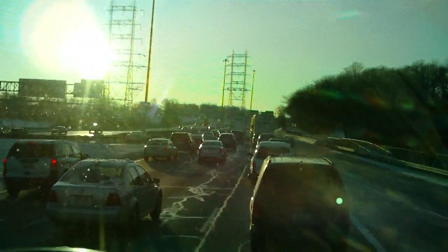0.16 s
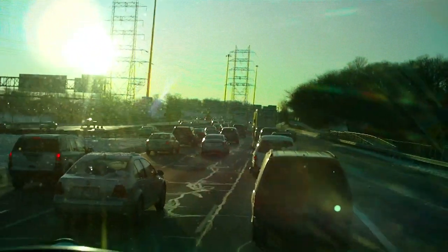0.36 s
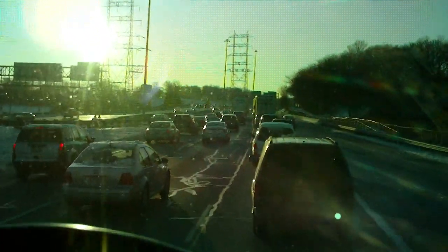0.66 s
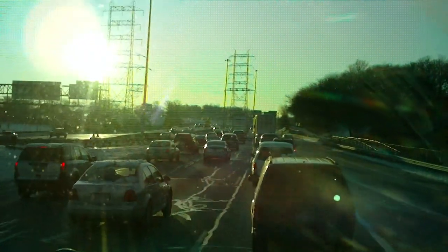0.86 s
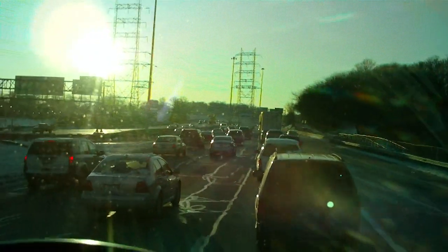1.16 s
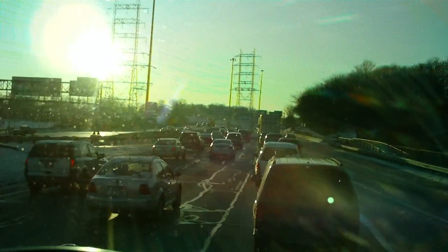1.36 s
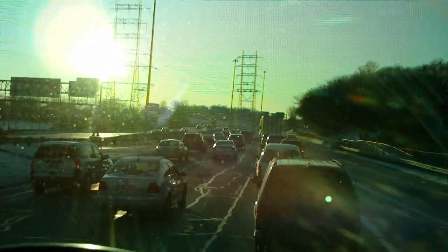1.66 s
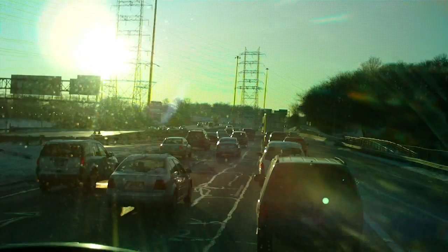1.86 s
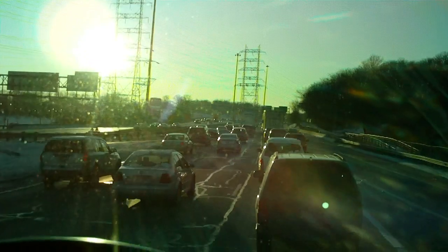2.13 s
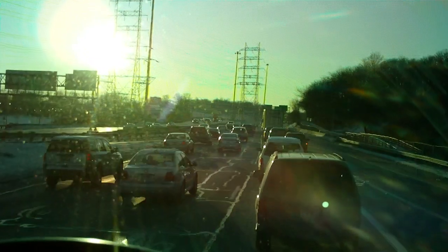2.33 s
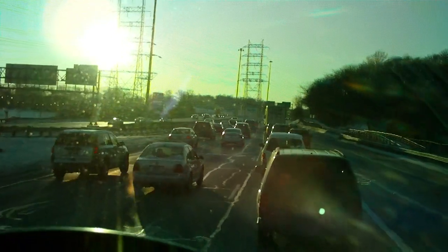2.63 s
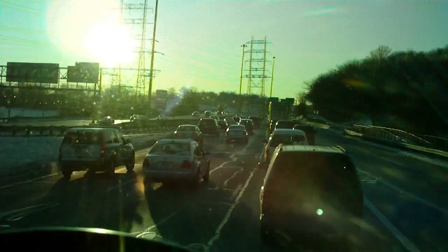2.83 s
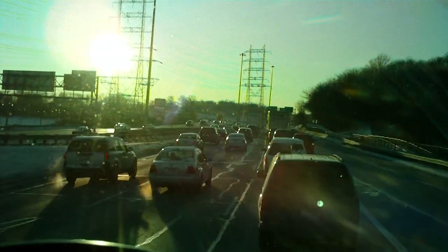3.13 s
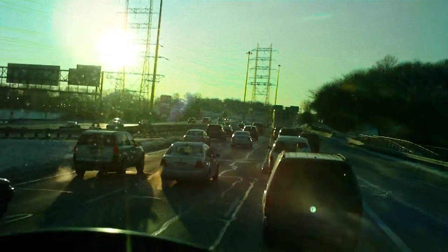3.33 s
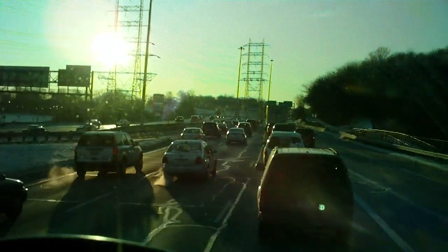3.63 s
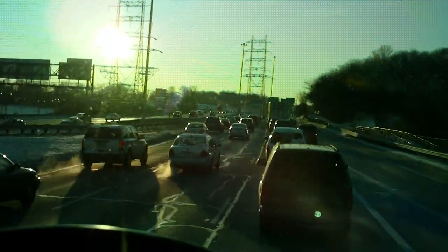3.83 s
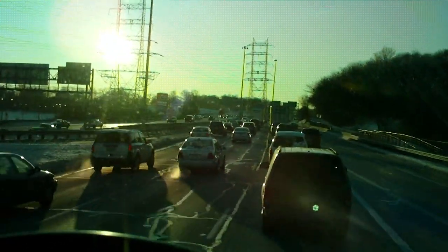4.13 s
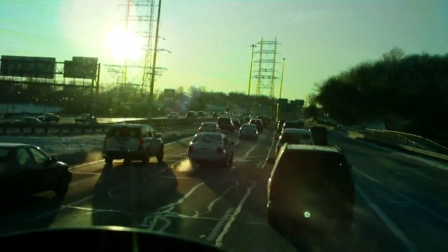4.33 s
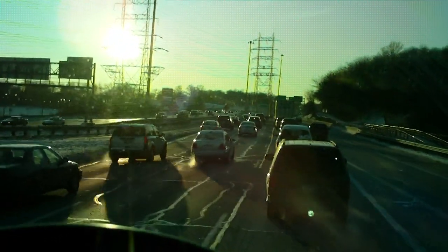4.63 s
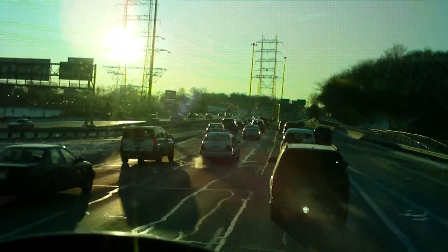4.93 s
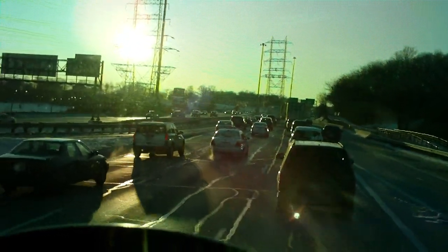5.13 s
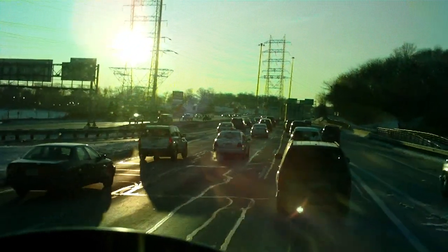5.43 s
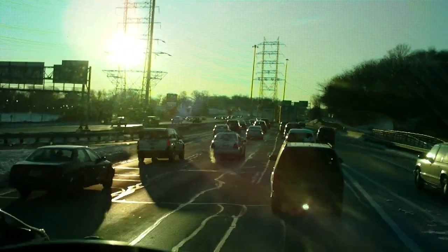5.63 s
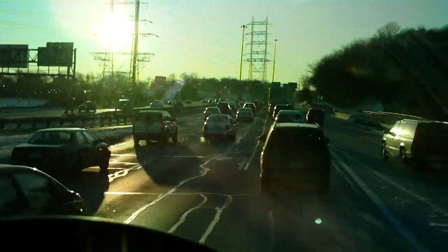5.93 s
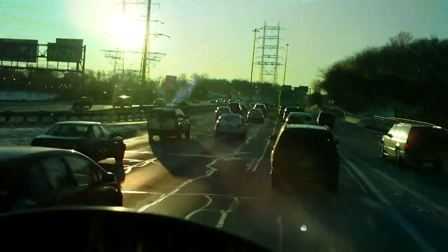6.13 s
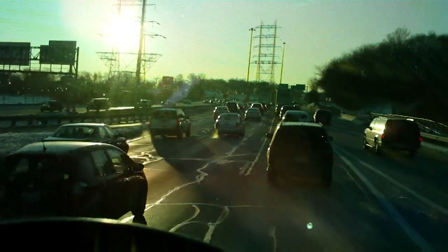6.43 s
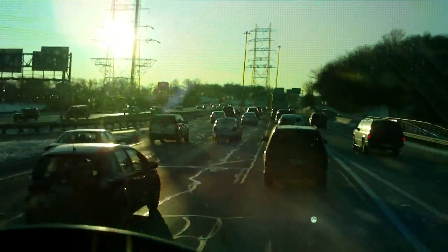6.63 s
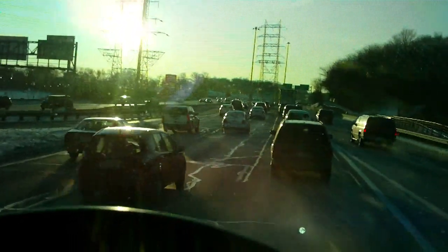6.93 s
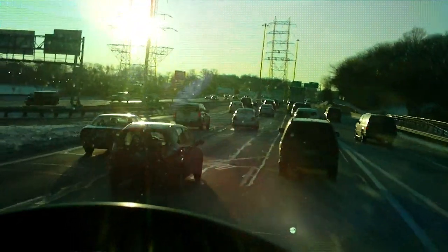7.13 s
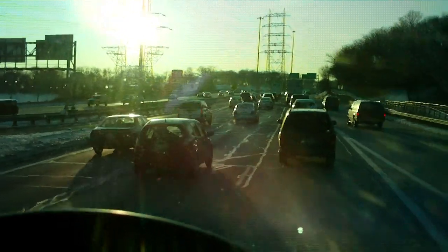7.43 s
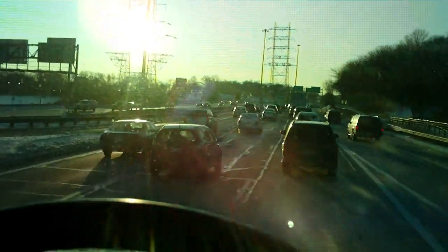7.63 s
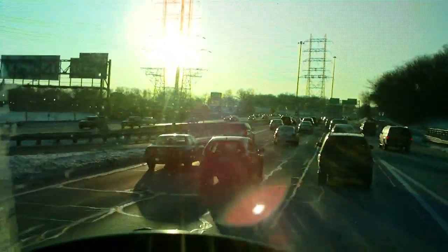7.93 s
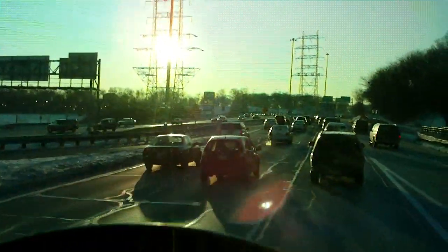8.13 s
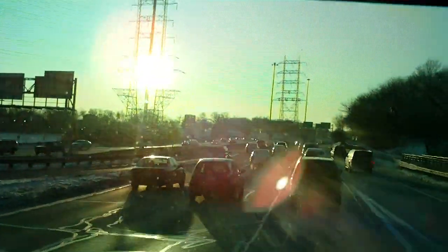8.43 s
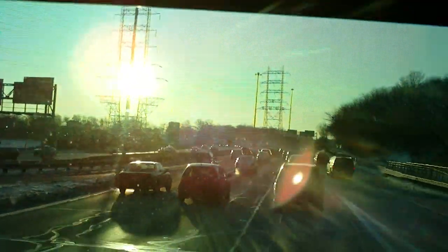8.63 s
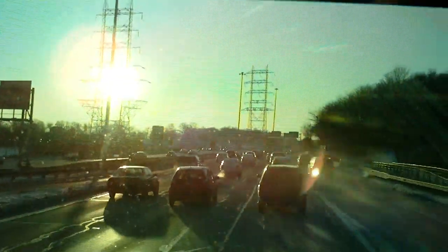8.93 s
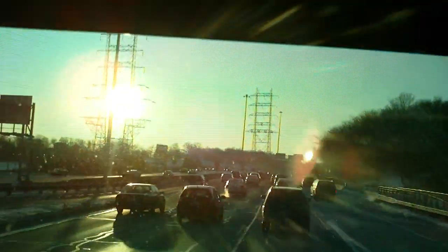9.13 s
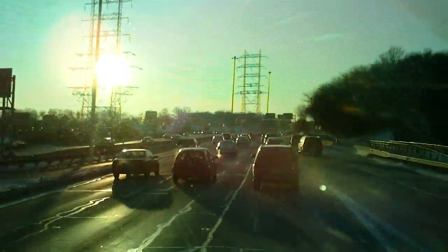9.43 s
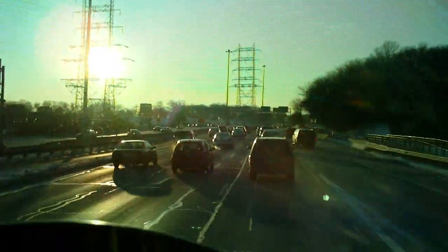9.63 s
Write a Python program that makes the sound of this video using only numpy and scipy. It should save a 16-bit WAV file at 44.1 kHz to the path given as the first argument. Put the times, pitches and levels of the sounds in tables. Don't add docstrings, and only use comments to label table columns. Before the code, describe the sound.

Heard inside a diesel truck cab in slow traffic through a small, overloaded microphone: bass is thinned and breaks into gritty crackle, treble is coarse and limited. From 0 to 3 s the engine coasts, its rapid throb slowing to a low chug; a faint high gear whine fades by about 2 s, with road bumps and brief thin hisses near 0.8 and 1.9 s. At 3.1 s the throttle opens, a faint belt squeal flickers until 3.8 s, and the engine climbs. It pulls loudest from about 4.2 to 5.4 s, knocking and growling, with longer air hisses around 4.3 and 5.6 s. It drops back by 6 s, catches abruptly at 6.6 s, wavers, then rises through a second surge, with sharp jolts near 7.6 and 8.2 s. Pitch peaks around 8.9 s; a final soft hiss comes near 9.35 s as the load eases.

```python
import sys
import numpy as np
from scipy import signal
from scipy.fft import rfft, irfft
from scipy.io import wavfile
from scipy.ndimage import uniform_filter1d, minimum_filter1d

SR = 44100
rng = np.random.default_rng(int(sys.argv[2]) if len(sys.argv) > 2 else 0)


def transcribe(u):
    v = np.clip(np.atleast_2d(u).T, -1, 1)
    q = np.round(v * 32767).astype(np.int16)
    wavfile.write(sys.argv[1], SR, q)


def volts_from_db(level):
    exponent = np.asarray(level, float) / 20
    return 10 ** exponent


N = 430857

# frequency in Hz, level in dB per Hz.
ROAD_COLOUR = [(15, -2.5), (40, -3), (90, 2.5), (140, 0), (200, -6.5), (300, -4), (450, -8), (620, -12),
               (1200, -27), (2500, -32.5)]
# middle in seconds, length in seconds, dB above HISS_DB.
HISSES = [
    (0.78, 0.41, 9),
    (1.55, 0.15, -1),
    (1.88, 0.27, 4),
    (4.3, 0.96, 10),
    (5.6, 1, 12.5),
    (9.35, 0.92, 6),
]
# frequency in Hz, width in Hz, level in dB.
HISS_MODES = [(5056, 80, 5), (5050, 80, -21)]
# time in seconds, level in dB.
SQUEAL = [
    (3.08, -77),
    (3.13, -50),
    (3.22, -49),
    (3.3, -60),
    (3.5, -51),
    (3.55, -47.5),
    (3.7, -44),
    (3.78, -80),
]
# frequency in Hz, width in Hz, level in dB.
SQUEAL_MODES = [(4250, 160, 0), (4600, 200, -5)]
# time in seconds, level in dB.
WHINE = [
    (0, -41),
    (.5, -40),
    (.9, -42),
    (1.4, -47),
    (2.0, -62),
    (9.77, -70),
]
# frequency in Hz, level in dB per Hz.
CLATTER_COLOUR = [(900, -12), (1200, 0), (1700, -2), (2200, -7), (3000, -12), (4000, -18), (5000, -25),
                  (6000, -30)]
# frequency in Hz, width in Hz, dB against the knock.
CLATTER_MODES = [(1620, 120, -19), (3830, 150, -32), (4270, 80, -29), (4670, 80, -27), (5100, 80, -27)]
# frequency in Hz, width in Hz, level in dB.
KNOCK_MODES = [(389.7, 23, -8), (644, 41, -11), (797.4, 46, -0.5), (936, 70, -0.5), (996.3, 100, -2)]
# time in seconds, firings per second in Hz.
SPEED = [(0.0, 33.4), (0.6, 29.4), (1.74, 25.7), (2.9, 17.8), (3.08, 18.5), (3.3, 25.7), (3.8, 37.0),
         (4.4, 35.8), (5.33, 41.1), (5.7, 38.8), (6.0, 33.6), (6.6, 29.2), (6.91, 33.4), (7.21, 30.3),
         (7.5, 34.0), (8.4, 39.0), (8.9, 43.0), (9.77, 37.3)]
# time in seconds, level in dB.
LOAD = [(0.0, -41), (1.5, -42), (3.05, -36.5), (3.14, -29.5), (3.4, -34.5), (3.8, -31.5), (4.16, -24),
        (5.2, -23.5), (5.55, -27.5), (6.0, -39), (6.57, -38.5), (6.63, -29), (6.95, -29), (7.37, -32),
        (8.5, -26.5), (9.3, -28.5), (9.55, -36), (9.77, -36.5)]
# middle in seconds, length in seconds, engine dB, road dB.
JOLTS = [(0.08, 0.033, 6.5, 1), (0.32, 0.12, 4.5, 1.5), (0.43, .04, 6, 4), (0.8, 0.14, 5, 3.5),
         (1.33, 0.3, 0, 3.5), (1.57, 0.23, 6, 4), (2.36, 0.057, 0, 7), (3.21, 0.071, 5, -0.5),
         (3.48, 0.08, -11, -7.5), (3.56, 0.036, 11.5, 5.5), (3.66, 0.14, 2.5, 1), (3.77, 0.059, 6.5, -2),
         (7.53, 0.016, -6, -19), (7.585, .07, 8, 14.5), (7.97, 0.016, -11, -12), (8.12, 0.07, -6.5, 5),
         (8.225, 0.039, 8, 11.5), (8.34, 0.077, -7.5, -5.5), (8.45, 0.066, 0, 6), (8.93, 0.046, -9, -8),
         (9.29, 0.062, 1.5, 1.5)]
ORDER_DB = [-26.5, -32.5, -31, -31]
ORDER_FOLLOWS = [.15, .2, .4, .3]
# middle in seconds, length in seconds, change in dB.
BOOMS = [
    [(0.3, 0.5, 2), (2.7, .45, 4.5), (3.3, 0.23, -6), (5.33, 0.19, 1), (6.1, 0.66, 3), (7.12, 0.88, -10.5),
     (9.05, 0.52, -10.5)],
    [(1.9, 0.91, 9), (2.6, 0.51, -13.5), (2.9, 0.11, 4), (4.18, .3, -1), (4.6, .3, -15), (7.15, 0.74, 12),
     (8.85, 0.81, 13)],
    [(0.75, 0.37, 9), (2.6, 0.95, -6), (4.3, 0.72, -8), (4.8, 0.39, 9), (5.6, 0.26, 7.5), (7.6, 1.05, 10),
     (9.3, 0.54, 5)],
    [(0.2, 0.54, -10), (1.65, 0.51, 9), (3.3, .25, 6.5), (3.8, 0.089, 14.5), (4.7, 0.83, 8.5),
     (6.15, .5, -6.5), (6.8, 0.44, 6), (8.25, 0.41, 3), (9.2, 1.1, -9)],
]
# middle in seconds, length in seconds, change in dB.
UPPER_BOOMS = [
    [(0.8, 0.71, -5.5), (5.0, 0.75, 4.5), (6.2, 0.87, -6), (8.8, 1.0, 8)],
    [(3.0, .3, -3), (4.3, 0.13, 2.5), (5.1, 0.43, 3), (6.5, .8, -5), (7.7, 0.69, 5)],
]
# frequency in Hz, dB against load.
CAB_MODES = [(90, -2.5), (150, -10), (180, -11), (207, 0), (240, -8), (280, -6.5), (330, -17), (390, -6),
             (420, -11), (480, -12.5)]
CRANK_DB = [-40, -39, -37, -40.5, -34.5, -36, -37.5, -40, -42.5, -43.5]
# time in seconds, drive (1 just touches the rail).
DRIVE = [(0.0, 1.12), (2.1, 1.1), (3.0, 1.05), (3.4, 1.16), (4.2, 1.02), (5.7, 1.05), (6.2, 1.15),
         (8.9, 1.15), (9.77, 1.0)]
# middle in seconds, length in seconds, drive lost.
LULLS = [(0.74, .14, .25), (1.14, .18, .25), (1.88, .14, .25), (2.2, .12, .25), (2.63, .13, .25),
         (2.85, .2, .04), (3.03, .14, .25), (4.05, .15, .2), (5.58, .2, .1)]
RECOVERY_HZ = [3200, 3700, 3900, 4000, 4100, 4350]

FULL_PULL_DB = -28
ROAD_DB, ROAD_FOLLOWS = -28.5, 0.56
CLATTER_DB, CLATTER_FOLLOWS = -39, .6
CLATTER_JOLTS = .25
UPPER_DB, UPPER_FOLLOWS = -31.5, .8
CRANK_FOLLOWS = 0.49
HISS_DB = -71.5
WHINE_ORDER = 30
LOW_CUT_HZ, OVERLOAD, HOLD_HZ = 285, 1., 12000


def rms_one(x):
    return x / np.sqrt(np.mean(x ** 2) + 1e-20)


def in_time(rows):
    s, *columns = np.transpose(rows)
    return [np.interp(np.arange(N) / SR, s, c) for c in columns]


def swells(rows):
    s, length, *sizes = np.transpose(rows)
    coarse = np.arange(0, N + 64, 64)
    distance = (coarse[:, None] / SR - s) / np.maximum(length, .01)
    bells = .5 ** ((2 * distance) ** 2)
    return [np.interp(np.arange(N), coarse, bells @ size) for size in sizes]


def drift(rate_hz):
    r = np.exp(-80 * np.pi * rate_hz / SR)
    noise = rng.standard_normal(N // 40 + 2002)
    slow = signal.lfilter([1], [1, -2 * r, r * r], noise)[2000:]
    return np.interp(np.arange(N) / 40, np.arange(len(slow)), rms_one(slow))


def coloured(spectrum):
    hz, level_db = np.transpose(spectrum)
    log_hz = np.log(np.arange(N // 2 + 1) * SR / N + 1)
    shape = volts_from_db(np.interp(log_hz, np.log(hz), level_db))
    return rms_one(irfft(rfft(rng.standard_normal(N)) * shape, N))


def resonate(x, modes):
    out = 0
    for k, (hz, width_hz, level_db) in enumerate(modes):
        r = np.exp(-np.pi * width_hz / SR)
        ring = signal.lfilter([1, 0, -1], [1, -2 * r * np.cos(2 * np.pi * hz / SR), r * r], x)
        out = out + (-1) ** k * volts_from_db(level_db) * rms_one(ring)
    return out


def bursts(turn, per_firing, sharp, spread_db, floor):
    count = (turn * per_firing).astype(int)
    size = volts_from_db(spread_db * rng.standard_normal(count[-1] + 1))[count]
    return floor + size * np.sin(np.pi * (turn * per_firing - count)) ** (2 * sharp)


def road_rumble(rumble_db):
    return volts_from_db(rumble_db + 3.0 + 1.5 * drift(37)) * coloured(ROAD_COLOUR)


def air_hiss():
    level_db = HISS_DB + swells(HISSES)[0] + 3.9 * drift(20)
    return volts_from_db(level_db) * resonate(rng.standard_normal(N), HISS_MODES)


def belt_squeal():
    level_db = in_time(SQUEAL)[0] + 2.77 * drift(23)
    return volts_from_db(level_db) * resonate(rng.standard_normal(N), SQUEAL_MODES)


def gear_whine(turn):
    return volts_from_db(in_time(WHINE)[0]) * np.sin(2 * np.pi * WHINE_ORDER * turn)


def clatter(turn, clatter_db, knock_db):
    gate = bursts(turn, 2, sharp=.8, spread_db=1.5, floor=.35)
    singing = resonate(gate * rng.standard_normal(N), CLATTER_MODES)
    rustle = rms_one(gate * coloured(CLATTER_COLOUR))
    return volts_from_db(clatter_db - 1.0) * rustle + volts_from_db(knock_db) * singing


def knock(turn):
    gate = bursts(turn, 0.99, sharp=1.4, spread_db=2.0, floor=1.0)
    return rms_one(resonate(gate * rng.standard_normal(N), KNOCK_MODES))


def orders(turn, firing_hz, levels_db, load_db, upper_booms_db):
    out = 0
    for k, level_db in enumerate(levels_db, 1):
        out = out - volts_from_db(level_db) * np.cos(2 * np.pi * k * turn + .15 * drift(3))
    for k in range(5, 13):
        passed_db = np.interp(k * firing_hz, *np.transpose(CAB_MODES)) + upper_booms_db.get(k, 0)
        level_db = 1.5 * load_db + 15 + passed_db + 2 * drift(1.5)
        out = out - volts_from_db(level_db) * np.cos(2 * np.pi * k * turn + .35 * drift(1.5))
    thirds = [k / 3 for k in range(2, 17) if k % 3]
    for k, third_db in zip(thirds, CRANK_DB):
        level_db = third_db + CRANK_FOLLOWS * (load_db - UPPER_DB) + 4.3 * drift(1.5)
        out = out + volts_from_db(level_db) * np.cos(2 * np.pi * k * turn + 1.5 * drift(1.5))
    return np.sqrt(2) * out


def cab(x):
    zero = np.exp(-2 * np.pi * LOW_CUT_HZ / SR)
    pole = np.exp(-2 * np.pi * 9.6 / SR)
    return signal.lfilter([1, -zero], [1, -pole], x)


def scene():
    firing_hz, = in_time(SPEED)
    load_db, = in_time(LOAD)
    swing_db = load_db - FULL_PULL_DB
    engine_jolt_db, road_jolt_db = swells(JOLTS)
    turn = np.cumsum(firing_hz) / SR

    rumble_db = ROAD_DB + ROAD_FOLLOWS * swing_db + road_jolt_db
    background = road_rumble(rumble_db) + air_hiss() + belt_squeal() + gear_whine(turn)

    knock_db = load_db + engine_jolt_db
    clatter_db = CLATTER_DB + CLATTER_FOLLOWS * swing_db + CLATTER_JOLTS * engine_jolt_db
    levels_db = [db + share * swing_db + swells(booms)[0]
                 for db, share, booms in zip(ORDER_DB, ORDER_FOLLOWS, BOOMS)]
    upper_booms_db = {k: swells(booms)[0] for k, booms in enumerate(UPPER_BOOMS, 5)}
    upper_load_db = UPPER_DB + UPPER_FOLLOWS * swing_db
    engine = clatter(turn, clatter_db, knock_db) + volts_from_db(knock_db) * knock(turn)
    engine = engine + orders(turn, firing_hz, levels_db, upper_load_db, upper_booms_db)
    return cab(background + engine)[None]


def gain_control(x, most_db, aim, span_s):
    span = int(span_s * SR)
    peak = -minimum_filter1d(-np.abs(x), span)
    return x * uniform_filter1d(np.minimum(volts_from_db(most_db), aim / peak), span)


def overload(x, stick, ring_width_hz, ring_db, tick_db, deaf, deaf_s):
    n = np.arange(N)
    hit = np.maximum.accumulate(np.where(np.abs(x) >= OVERLOAD, n, -N))
    clear = np.maximum.accumulate(np.where(np.abs(x) < OVERLOAD - stick, n, -N))
    stuck = hit > clear
    treble = signal.sosfilt(signal.butter(2, 600, "high", fs=SR, output="sos"), x)
    dulled = x - deaf * np.exp((hit - n) / (deaf_s * SR)) * treble
    out = np.where(stuck, OVERLOAD * np.sign(x), dulled)
    released = np.diff(stuck * 1., prepend=0) < 0
    snap = -stick * np.sign(x) * released * volts_from_db(ring_db + 3.0 * rng.standard_normal(N))
    dealt = rng.integers(0, len(RECOVERY_HZ), N)
    r = np.exp(-np.pi * ring_width_hz / SR)
    for k, hz in enumerate(RECOVERY_HZ):
        w = 2 * np.pi * hz / SR
        kicks = snap * (dealt == k) + 1e-18
        out = out + ~stuck * signal.lfilter([0, np.sin(w)], [1, -2 * r * np.cos(w), r * r], kicks)
    return out + volts_from_db(tick_db) * np.diff(snap, prepend=0)


def sample_hold(x):
    at = np.arange(N * HOLD_HZ // SR + 2) * SR / HOLD_HZ
    area = np.cumsum(np.interp(at, np.arange(N), x)) * SR / HOLD_HZ
    return np.diff(np.interp(np.arange(N + 1), at, area))


def band_limit(x):
    return signal.sosfilt(signal.butter(12, 15850, fs=SR, output="sos"), x)


def record(dry):
    aim = (in_time(DRIVE)[0] - swells(LULLS)[0]) ** 1.55
    x = gain_control(dry[0], most_db=4.0, aim=aim, span_s=.022)
    x = overload(x, stick=.05, ring_width_hz=450, ring_db=-6, tick_db=6, deaf=.7, deaf_s=.012)
    pole = np.exp(-2 * np.pi * LOW_CUT_HZ / SR)
    x = signal.lfilter([1, -1], [1, -pole], x)
    x = signal.sosfilt(signal.butter(6, 5400, fs=SR, output="sos"), x)
    mix = sample_hold(x)[None]
    return band_limit(mix)


dry = scene()
out = record(dry)
transcribe(out)
```